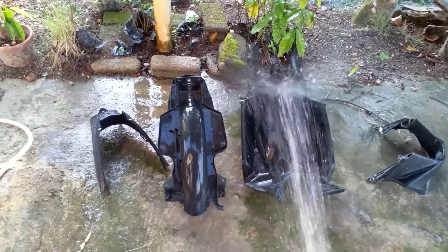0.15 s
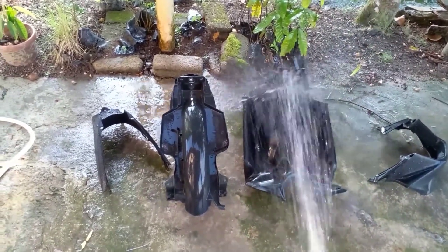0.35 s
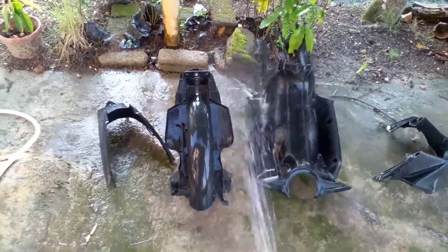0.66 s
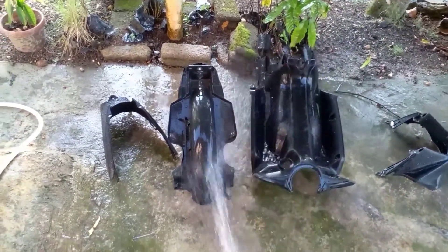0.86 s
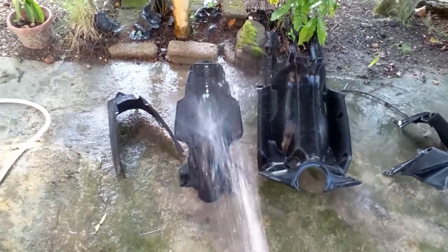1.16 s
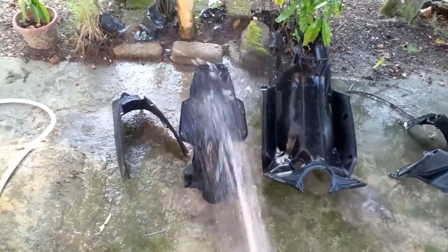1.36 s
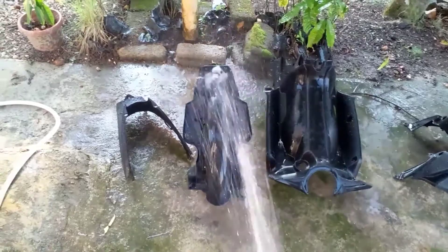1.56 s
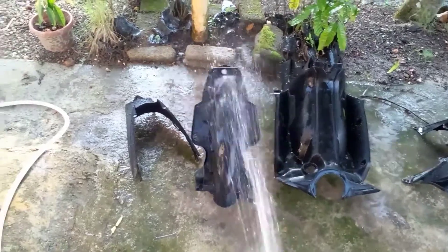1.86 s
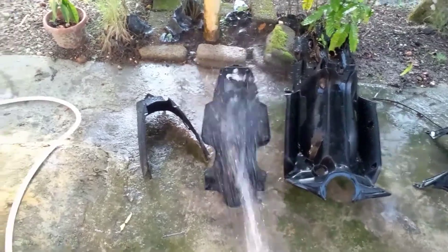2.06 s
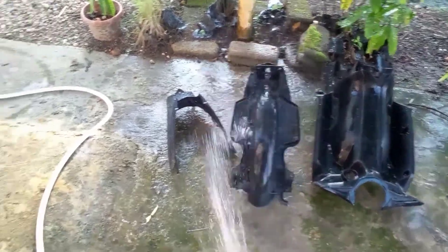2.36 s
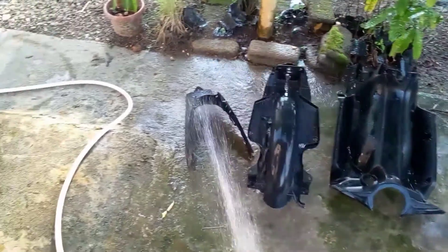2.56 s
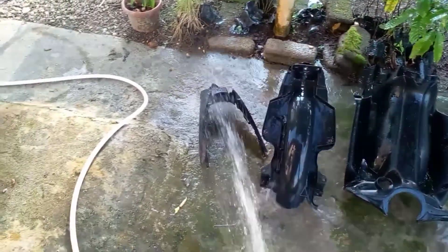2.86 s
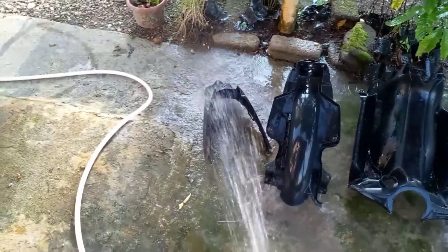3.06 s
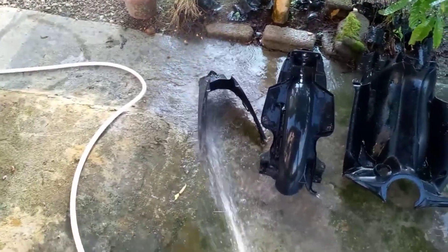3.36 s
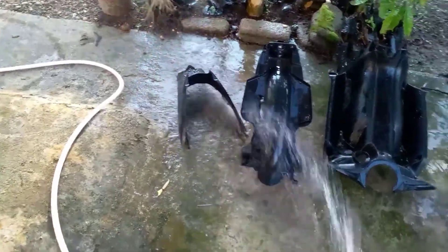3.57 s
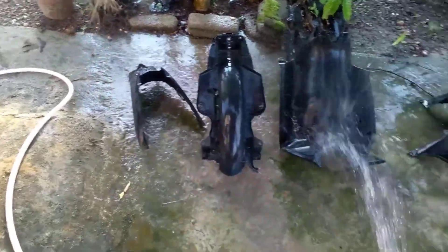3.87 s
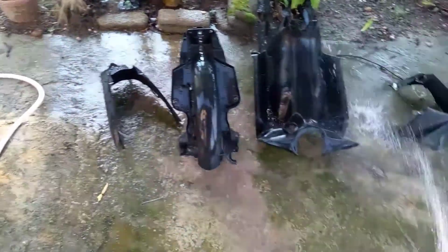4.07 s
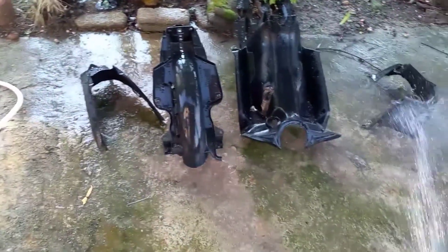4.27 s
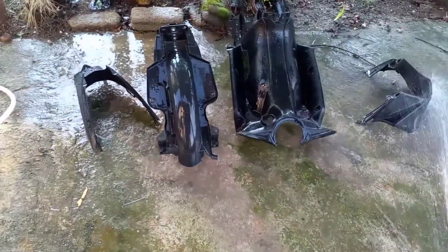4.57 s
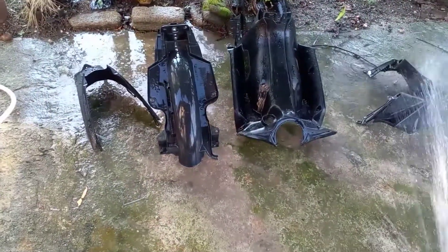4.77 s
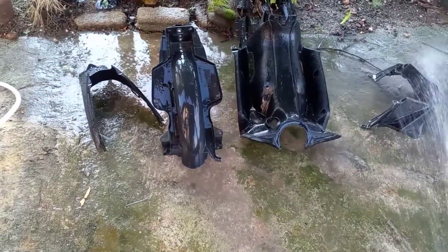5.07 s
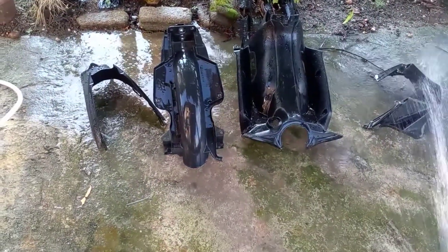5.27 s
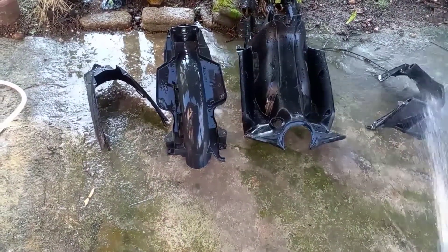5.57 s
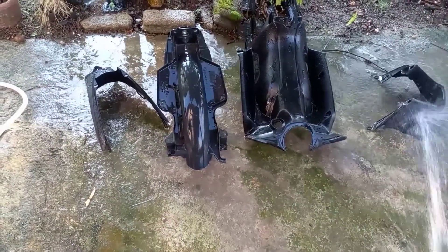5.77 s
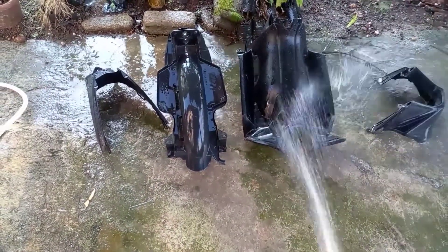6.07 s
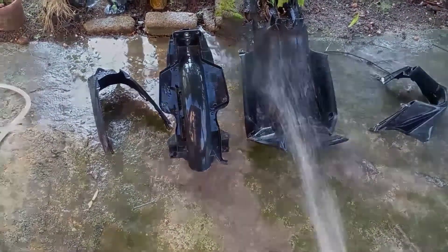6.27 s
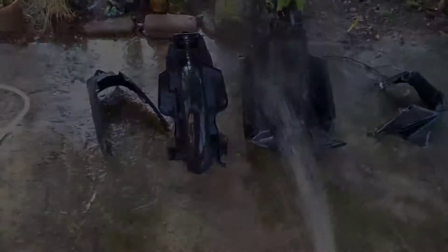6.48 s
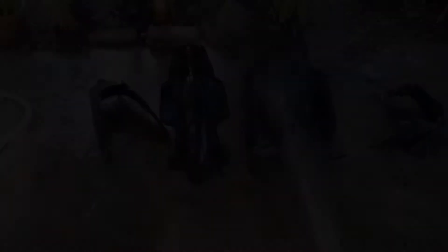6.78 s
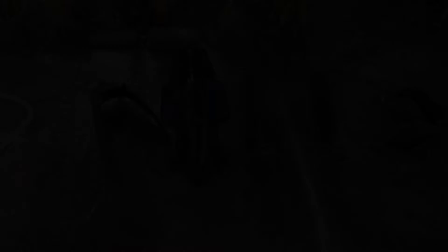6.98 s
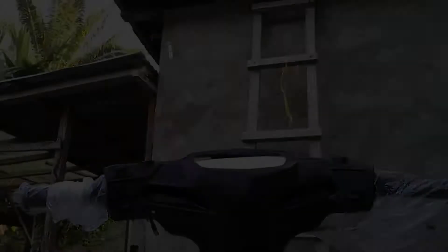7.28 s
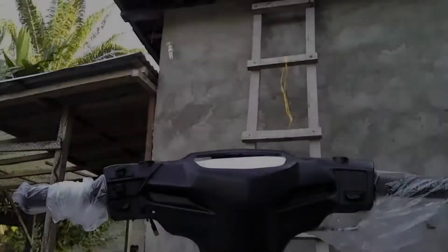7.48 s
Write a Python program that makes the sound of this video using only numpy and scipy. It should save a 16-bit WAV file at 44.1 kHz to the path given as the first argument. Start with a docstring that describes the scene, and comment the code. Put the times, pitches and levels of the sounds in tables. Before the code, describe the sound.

A hose jet sweeps over four plastic panels on wet concrete outdoors. The spray drums on the large and middle shells, thins to light hiss on a narrow arch, then patters hollowly on a small piece and returns to the large one. Drops tick, heavy slugs knock, a faint engine hums far away. One nearby microphone; everything fades to silence, then a low hum begins.

```python
"""Garden hose on plastic panels

A jet over four panels on wet concrete: noise shaken by random drops and slugs takes the colour of the panel.
Large drops tick (short rings, cracks), slugs knock (decaying shell modes), filling hollows ring (sliding resonance).
A bird chirps (swept sines), a distant engine hums (wavering orders over filtered noise). All this fades out;
after a silence a lumpy low hum and faint outdoor air (filtered noise) swell up."""
import sys
import numpy as np
from scipy import signal
from scipy.io import wavfile
from scipy.ndimage import uniform_filter1d

SR = 44100
rng = np.random.default_rng(int(sys.argv[2]) if len(sys.argv) > 2 else 0)


def gain_from_db(level_db):
    """Convert decibel levels to linear amplitude factors (20 dB per decade)."""
    decades = np.asarray(level_db, float) / 20
    return 10 ** decades


def file_out(sig):
    """Save sig as 16-bit WAV at sys.argv[1]."""
    # one column per channel
    cols = np.atleast_2d(sig).T
    # limit, then scale
    lim = np.clip(cols, -1, 1)
    pcm = np.round(lim * 32767).astype(np.int16)
    wavfile.write(sys.argv[1], SR, pcm)


N = 336924
TIME = np.arange(N) / SR
TAPS_HZ = np.fft.rfftfreq(4096, 1 / SR)


def evened(x):
    """Scales to rms 1."""
    return x / np.sqrt(np.mean(x ** 2) + 1e-20)


def read(points):
    """Spectrum in dB at every filter bin, interpolated over log frequency."""
    hz, db = np.transpose(points)
    return np.interp(np.log(TAPS_HZ + 1), np.log(hz + 1), db)


def play(rows):
    """Joins the rows of a curve, holding its last values."""
    s, *columns = np.transpose(rows)
    return [np.interp(TIME, s, c) for c in columns]


def bands(peaks):
    """Sum of bell-shaped lifts in dB."""
    return sum(db * np.exp(-((TAPS_HZ - hz) / width_hz) ** 2) for hz, width_hz, db in peaks)


def colour(x, db):
    """Causal minimum-phase filter of energy 1 with the given dB shape."""
    log_gain = np.log(gain_from_db(np.maximum(db - db.max(), -100)))
    circle = np.concatenate([log_gain, log_gain[-2:0:-1]])
    spectrum = np.exp(np.conj(signal.hilbert(circle)))
    taps = np.fft.ifft(spectrum).real
    return signal.oaconvolve(x, taps / np.linalg.norm(taps))[:N]


def add(mix, s, sound):
    """Mixes a sound in at a time."""
    part = mix[round(s * SR):][:len(sound)]
    part += sound[:len(part)]


def wander(per_s):
    """Slow random curve of rms 1: sines of random phase up to the given rate."""
    hz = np.geomspace(per_s / 8, per_s, num=24)
    coarse = TIME[::64]
    turns = hz * coarse[:, None] + rng.random(len(hz))
    sines = np.sin(2 * np.pi * turns)
    return np.interp(TIME, coarse, evened(sines.sum(axis=1)))


def lopsided(t, rise_s, fall_s):
    """Pulse with a Gaussian rise and an exponential fall."""
    return np.where(t < 0, np.exp(-(t / rise_s) ** 2), np.exp(-np.abs(t) / fall_s))


# where the jet lands: (from [s], panel: 0 large, 1 middle, 2 thin arch, 3 small, 4 near end of the large)
AIM = [(0, 0), (.89, 1), (1.56, 1), (2.42, 2), (3.64, 1), (3.76, 4), (3.9, 4), (4.2, 3), (4.9, 3),
       (5.38, 3), (6.1, 4), (6.22, 4)]


def aim_at(s):
    """Row of the aim that holds at a time."""
    return np.searchsorted([row[0] for row in AIM], s, "right") - 1


def panel_at(s):
    """Panel the jet is on."""
    return np.array([row[1] for row in AIM])[aim_at(s)]


# colour of each panel under the jet: (frequency [Hz], relative level per Hz [dB])
LARGE = [(120, -54.5), (200, -7.5), (422, 2), (564, -6), (842, -12.5), (940, -7.5), (1300, -21),
         (1520, -14), (1780, -13.5), (2050, -18), (2850, -16.5), (3300, -24.5), (6590, -28.5),
         (7350, -24.5), (8200, -31), (15500, -22)]
MIDDLE = [(120, -58.5), (200, -7), (422, 3), (564, -4.5), (755, -11.5), (1430, -7), (1880, -9), (2130, -6),
          (2900, -9.5), (3550, -12.5), (4030, -12.5), (6240, -15), (7620, -16.5), (9480, -18),
          (14200, -9.5), (15500, -8.5)]
ARCH = [(120, -37), (200, -6), (298, -11), (339, -3), (385, -7), (422, -11.5), (554, -3), (618, -13),
        (769, -7), (1300, -13), (1600, -7.5), (2170, -6), (2500, -11.5), (3610, -21), (7220, -21.5),
        (8500, -22), (15500, -13.5)]
SMALL = [(120, -41.5), (200, -18), (249, -13), (370, -3), (440, -6), (534, 3.5), (702, -15), (923, -6),
         (1400, -22), (1590, -11), (1840, -14), (2200, -12.5), (2700, -20), (6020, -19.5), (9480, -23),
         (13200, -13), (15500, -14)]
LARGE_NEAR = [(120, -22.5), (200, -26), (310, -2), (454, -6), (506, 0), (618, -12), (858, -11), (1330, -11),
              (1680, -5.5), (2250, -6), (2500, -9.5), (3300, -22), (5910, -27.5), (8200, -31.5),
              (12200, -20.5), (15500, -19)]
# per panel, narrow bands in patter and fizz: (frequency [Hz], width [Hz], lift [dB])
FIZZ_BANDS = [
    [(4200, 320, 3.5), (7400, 250, 1.5), (11000, 250, 0)],
    [(2360, 250, 0), (3950, 200, 1.5), (7600, 350, 5)],
    [(2240, 186, 0.5), (4860, 890, 3.5), (7300, 450, 5.5), (11000, 250, 0), (13070, 400, 0)],
    [(4460, 280, 2.5), (5900, 390, 1.5), (8860, 240, 2.5), (11800, 550, 2.5), (13500, 500, -2.5)],
    [(4630, 550, 2.5), (7500, 500, 5.5), (8850, 400, 5.5)],
]
# the bounce off the concrete cancels part of the spray: (frequency [Hz], width [Hz], lift [dB])
GROUND_DIP = [(1324, 99, -1.5), (2920, 490, -0.5)]
# drumming, patter, fizz: (low edge [Hz], high edge [Hz])
BAND_EDGES_HZ = [(190, 1200), (1200, 3200), (3200, 20000)]
# per band, share of the power swing from drops: (share [0-1])
DROP_DEPTH = [0.2, 0.55, 0.62]
# per band, share of the power swing from slugs of water: (share [0-1])
SLUG_DEPTH = [0.5, 0.45, 0.42]
# per band, ringing drops against the hiss: (amplitude ratio)
PING_SHARE = [0.34, 0.11, 0.32]


def jet():
    """One stream of drops and slugs shakes noise into the colour of the panel that is hit."""
    drops = bursts(per_s=400, spread_db=2.2, rise_s=0.0001, fall_s=0.0014)
    slugs = bursts(per_s=95, spread_db=2.0, rise_s=0.0008, fall_s=0.011)
    hit = panel_at(TIME)
    levels_db = jet_levels_db()
    ringing = pings(per_s=1800, spread_db=3.4, cycles=7)
    # dense modes of each shell, too close to tell apart
    ripple = uniform_filter1d(rng.standard_normal((5, len(TAPS_HZ))), size=4, axis=1)
    fine_db = 1.3 * evened(ripple)
    panels = [LARGE, MIDDLE, ARCH, SMALL, LARGE_NEAR]
    out = np.zeros(N)
    for (low_hz, high_hz), db, drop, slug, ping in zip(
            BAND_EDGES_HZ, levels_db, DROP_DEPTH, SLUG_DEPTH, PING_SHARE):
        power = (1 - drop + drop * drops) * (1 - slug + slug * slugs)
        hiss = np.sqrt(power) * rng.standard_normal(N)
        drive = evened(hiss + ping * ringing) * gain_from_db(db)
        low_cut = 1 + (low_hz / (TAPS_HZ + 1)) ** 16
        high_cut = 1 + (TAPS_HZ / high_hz) ** 16
        band_db = -10 * np.log10(low_cut * high_cut)
        for k, panel in enumerate(panels):
            share = uniform_filter1d(1. * (hit == k), size=900)  # the jet crosses an edge in 20 ms
            shape_db = read(panel) + bands(FIZZ_BANDS[k] + GROUND_DIP) + fine_db[k] + band_db
            out += colour(drive * np.sqrt(np.abs(share)), shape_db)
    return out


# the jet: (time [s], force on the shell [dB], mist thrown up [dB above the force])
JET = [(0.0, -24.5, -2), (0.05, -26.5, -0.5), (0.16, -27, 1), (0.18, -28.5, 1), (0.3, -27.5, -1),
       (0.57, -29, 1), (0.6, -25, 0.5), (0.68, -31, 0.5), (0.76, -31, 6.5), (0.81, -36, 4.5),
       (0.87, -38.5, 8.5), (0.89, -43.5, 12), (0.902, -28, 4), (0.915, -26.5, 2.5), (1.0, -25, 2.5),
       (1.08, -30.5, 3), (1.21, -23, -1), (1.3, -29.5, 2.5), (1.39, -27, 5), (1.46, -30.5, 3),
       (1.54, -27, 4.5), (1.57, -25.5, 2.5), (1.65, -29, 6.5), (1.69, -23, 2.5), (1.72, -30, 7),
       (1.75, -25, 4.5), (1.79, -32, 9), (1.835, -21.5, -2), (1.87, -26.5, 6), (1.97, -26.5, 3.5),
       (2.07, -28, 4), (2.12, -26, 1.5), (2.165, -23, -1), (2.18, -20, -3), (2.208, -23, 0.5),
       (2.222, -34.5, 4), (2.25, -25, 2.5), (2.29, -29, 3.5), (2.39, -24, 2.5), (2.42, -36.5, 5),
       (2.46, -32, -1), (2.48, -42, 8), (2.52, -42.5, 13), (2.6, -36.5, 7), (2.68, -31.5, 3.5),
       (2.74, -34, 2.5), (2.78, -28, -2), (2.853, -30.5, 6.5), (2.87, -36.5, -1.5), (2.98, -38.5, 7.5),
       (3.03, -35, 5), (3.1, -38, 3.5), (3.3, -38.5, 4.5), (3.45, -43, 9), (3.6, -44, 10.5),
       (3.645, -45.5, 10), (3.652, -22.5, 2), (3.67, -27.5, 1.5), (3.72, -31.5, 0), (3.745, -38.5, -1),
       (3.77, -35.5, 5), (3.81, -27.5, 2.5), (3.86, -32, 3.5), (3.92, -32, 3.5), (3.98, -36.5, 6),
       (4.07, -32.5, 8), (4.1, -42.5, 11), (4.15, -45.5, 22.5), (4.19, -37, 8.5), (4.22, -32, 6.5),
       (4.29, -33.5, 6.5), (4.42, -29.5, 6.5), (4.51, -30, 4), (4.55, -34, 5), (4.67, -43, 9.5),
       (4.87, -32, 3.5), (4.915, -28.5, 1), (4.94, -33, 3), (4.965, -25.5, 1.5), (4.98, -28.5, 2),
       (4.99, -25.5, 1.5), (5.03, -28.5, 2), (5.15, -34, 5), (5.2, -29, -0.5), (5.33, -30.5, 6.5),
       (5.43, -26.5, 2.5), (5.54, -30, 2.5), (5.95, -28.5, 4.5), (6.02, -34, 5.5), (6.1, -39, 10.5),
       (6.125, -31, 4.5), (6.175, -24.5, -3), (6.195, -29, -0.5), (6.225, -25.5, -0.5), (6.3, -31, 1),
       (6.45, -29.5, -1.5), (6.6, -29.5, 1.5), (6.7, -29.5, 0.5), (6.74, -34.5, 5), (6.8, -31, 0.5),
       (6.93, -32, 0.5), (6.96, -32.5, -0.5), (7.1, -30, 0)]
# per aim row, hollowness of the spot: (drumming [dB above the force])
HOLLOW_DB = [2, -0.5, -4, -5.5, -1.5, 5, 2.5, -2, -5.5, -2.5, 2.5, -0.5]
# per aim row: (patter [dB above the force])
PATTER_DB = [-0.38, -1.04, -1.5, -0.84, -2.6, -0.56, 0.75, -1.2, -0.92, -1, -1.7, -0.36]
# per band, its own slow random surge of the stream: (swing [dB rms], sign has no audible effect)
SURGE_DB = [0.5, -1, 0.5]


def jet_levels_db():
    """Drumming, patter and fizz all follow the force; a glancing jet mists more and drums less."""
    glance, force_swing = 0.11, 0.029  # drumming lost per dB of mist; extra drumming per dB of force
    force_db, mist_db = play(JET)
    spots_db = np.array([HOLLOW_DB, PATTER_DB], float)[:, aim_at(TIME)]
    hollow_db, patter_db = uniform_filter1d(spots_db, size=900, axis=1)
    drumming_db = force_db + hollow_db - glance * mist_db + force_swing * (force_db + 30)
    levels_db = [drumming_db, force_db + patter_db, force_db + mist_db]
    return [db + surge_db * wander(per_s=25) for db, surge_db in zip(levels_db, SURGE_DB)]


def bursts(per_s, spread_db, rise_s, fall_s):
    """Power envelope of random impacts, a few of them large; mean 1."""
    struck = np.minimum(rng.exponential(1, N), 3.2)
    size = gain_from_db(2 * spread_db * struck) * (rng.random(N) < per_s / SR)
    t = np.arange(4000) / SR
    pulse = np.exp(-t / fall_s) * (1 - np.exp(-t / rise_s))
    power = np.abs(signal.oaconvolve(size, pulse)[:N])
    return power / power.mean()


def pings(per_s, spread_db, cycles):
    """Small drops, each a decaying, slightly rising sine at one of 20 pitches; rms 1."""
    struck = np.minimum(rng.exponential(1, N), 4)
    size = gain_from_db(spread_db * struck) * (rng.random(N) < per_s / SR)
    pitches_hz = np.geomspace(300, 12000, num=20)
    which, out = rng.integers(0, len(pitches_hz), N), np.zeros(N)
    for k, hz in enumerate(pitches_hz):
        turns = np.arange(2000) * hz / SR
        envelope = np.exp(-turns / cycles) * (1 - np.exp(-turns))
        ring = envelope * np.sin(2 * np.pi * turns * (1 + 0.0042 * turns))
        out += signal.oaconvolve(size * (which == k), hz / 1000 * ring)[:N]
    return evened(out)


def patchy(x):
    """Lifts and lowers random patches of the spectrum, about 700 Hz wide and 70 ms long."""
    patch_db = 1.4  # rms
    z = signal.stft(x, nperseg=512)[2]
    patches = rng.standard_normal(z.shape[::-1])
    for _ in range(2):
        patches = uniform_filter1d(patches, size=9, axis=0)
        patches = uniform_filter1d(patches, size=6, axis=1)
    return signal.istft(z * gain_from_db(patch_db * evened(patches).T), nperseg=512)[1][:N]


# large drops: (peak time [s], level [dB], ring [Hz], share of crack [0-1])
TICKS = [(0.079, -8.5, 6600, 0.48), (0.1263, -12.5, 7060, 0.45), (0.2003, -17, 11000, .4),
         (0.46, -18, 9000, 0.6), (0.71, -10.5, 3740, 0.65), (0.9102, -6.5, 5300, 0.5),
         (0.9215, -8, 2410, 0.5), (0.9375, -10, 2500, 0.6), (0.9955, -9.5, 2070, .3),
         (1.0001, -9.5, 11900, 0.8), (1.036, -11, 9000, 0.7), (1.162, -19, 2600, 0.7),
         (1.2434, -15, 8850, 0.8), (1.274, -14, 11900, .1), (1.3233, -11, 2580, 0.4),
         (1.541, -10.5, 2550, .4), (1.4742, -12.5, 2730, 0.35), (1.5884, -6.5, 4040, 0.6),
         (1.696, -13, 3170, 0.3), (1.728, -18, 4000, .7), (1.836, -17, 2540, 0.44), (1.924, -15, 4030, 0.4),
         (2.058, -16, 2550, 0.6), (1.8947, -6.5, 11000, 0.6), (1.9675, -14, 8120, 0.7),
         (1.995, -17, 6600, .3), (2.1777, -9, 4640, 0.6), (2.208, -14, 4700, 0.6), (2.2433, -9, 4930, 0.7),
         (2.3498, -8, 12200, 0.35), (2.3869, -14.5, 4300, 0.34), (2.162, -17, 4100, .2),
         (2.5393, -16, 5440, 0.4), (2.5586, -11, 7100, 0.5), (2.6506, -17, 7340, 0.25),
         (2.7185, -21, 7200, 0.3), (2.8, -16, 7050, 0.6), (2.8295, -10.5, 5460, 0.67),
         (2.8548, -9, 11800, 0.5), (2.9158, -24, 2670, 0.15), (2.964, -16.5, 7140, 1),
         (3.028, -16.5, 2070, 0.5), (3.129, -19, 2760, 0.5), (3.1679, -19.5, 806, 0.55),
         (3.211, -27, 3930, 0.2), (3.2335, -22, 2650, 0.1), (3.28, -25, 6500, .8), (3.267, -23, 2150, 0.2),
         (3.268, -29, 800, 0.1), (3.402, -30, 2150, 0), (2.966, -24, 2700, .2), (3.3382, -26, 2800, .2),
         (3.379, -22, 2730, 0.26), (3.4275, -20, 7300, .6), (3.4534, -20, 2760, 0.13),
         (3.497, -22, 7250, 0.5), (3.5895, -20, 7400, 0.7), (3.6304, -21, 2660, 0.4),
         (3.6559, -11, 6300, 0.6), (3.7278, -20, 2700, 0.24), (3.7708, -15, 4460, 0.37),
         (4.0245, -19, 6180, .9), (4.1415, -20, 9500, .8), (4.5065, -6.5, 11000, .7),
         (4.556, -17, 11800, 0.4), (4.718, -26.5, 1880, 0), (4.6835, -20, 6000, 0.75),
         (4.7808, -17.5, 5900, 0.3), (4.821, -15, 1930, 0.1), (4.8526, -9, 4240, 0.6),
         (4.943, -17, 12000, .2), (4.9882, -12, 6140, 0.53), (4.9993, -8.5, 1840, 0.35),
         (5.0631, -12, 4350, .5), (5.139, -13.5, 1910, 0.1), (5.184, -10, 12100, 0.4),
         (5.222, -14, 9900, 0.25), (5.243, -16, 4400, 0.5), (5.4353, -14, 11000, 0.2),
         (5.602, -10.5, 4540, 0.7), (5.666, -13.5, 3830, 0.66), (5.7944, -16, 4700, 0.5),
         (5.9952, -11, 5300, 0.8), (6.1739, -10.5, 970, 0.06), (6.2205, -17, 4900, 0.66),
         (6.2612, -13, 7570, 0.73), (6.372, -20, 7800, 0.45), (6.396, -25, 5240, .7),
         (6.481, -15, 4690, 0.8), (6.502, -20, 4630, 0.5), (6.575, -21, 6000, .8), (6.6734, -16, 4730, 0.4),
         (6.461, -25, 4800, 0.4), (6.8135, -15, 6000, 0.9), (6.828, -15, 13500, .2),
         (6.918, -19, 5000, 0.7), (6.931, -16, 2100, 0.4)]
# colour of the crack: (frequency [Hz], relative level per Hz [dB])
CRACK = [(1500, -27), (3000, -0.5), (6000, -2.5), (9000, -2.5), (15500, 0)]


def ticks():
    """Each large drop: a few cycles of ring under a short crack of noise; lesser ones ring the panel's bands."""
    small_per_s, small_db, small_spread_db = 45, -30.5, 2.5
    crack_rise_s, crack_fall_s = 0.0001, 0.001
    t, rings, cracks = np.arange(900) / SR - 0.003, np.zeros(N), np.zeros(N)
    rows = list(TICKS)
    for when, size, band, share in rng.random((round(small_per_s * 7), 4)):
        s = when * 7 + 0.01
        peaks = FIZZ_BANDS[panel_at(s)]
        hz = peaks[int(band * len(peaks))][0]
        db = small_db - small_spread_db * np.log(max(size, 0.06))
        rows.append((s, db, hz, 0.4 + 0.6 * share))
    for (s, db, hz, share), noise in zip(rows, rng.standard_normal((len(rows), 2, 900))):
        width_s = 0.001 + 1.6 / hz  # low rings last longer
        wobble = np.cumsum(hz / 28000 * noise[1])  # high rings wobble more
        ring = lopsided(t, 0.6 * width_s, 1.5 * width_s) * np.cos(2 * np.pi * hz * t + wobble)
        add(rings, s + t[0], gain_from_db(db) * (1 - share) * ring)
        puff = lopsided(t, crack_rise_s, crack_fall_s) * noise[0]
        add(cracks, s + t[0], gain_from_db(db) * share * 2 * puff / np.abs(puff).max())
    return rings + colour(cracks, read(CRACK))


# a hollow filling with water: (start [s], length [s], rms level before the envelope [dB], from [Hz], to [Hz])
HOLLOW_RINGS = [(0.892, 0.185, -30, 2440, 2000), (2.582, 0.31, -34.5, 2150, 2320),
                (2.4, 0.43, -42, 2650, 2400), (4.79, 0.41, -30, 2000, 1870),
                (5.297, 0.31, -29.5, 1790, 2040), (4.4, 0.66, -37, 2900, 2000),
                (4.7, 0.22, -45.5, 1200, 2000), (0.2, 0.61, -39.5, 1500, 1650),
                (2.95, 0.36, -44.5, 2150, 2050)]


def hollows():
    """Bursts of splash excite one resonance whose pitch slides as the water level changes."""
    width_hz, rise_share = 280, 0.15  # rise as a share of the length
    power = 0.26 + bursts(per_s=200, spread_db=3.0, rise_s=0.00059, fall_s=0.0029)
    splash = np.sqrt(power) * rng.standard_normal(N)
    r, out = np.exp(-np.pi * width_hz / SR), np.zeros(N)
    for s, length_s, db, from_hz, to_hz in HOLLOW_RINGS:
        drive = splash[round(s * SR):][:round(length_s * SR)]
        u = np.linspace(0, 1, len(drive))
        turn = np.exp(2j * np.pi * np.cumsum(from_hz + (to_hz - from_hz) * u) / SR)
        # shift the pitch to 0 Hz, smooth with a double pole, shift back
        smooth = signal.lfilter([1], np.convolve([1, -r], [1, -r]), drive / turn)
        ring = evened((turn * smooth).real)
        envelope = np.sqrt(np.clip(np.minimum(u / rise_share, 2 * (1 - u)), 0, 1))
        add(out, s, gain_from_db(db) * envelope * ring)
    return out


# heavy slugs: (time [s], level before attack and decay [dB], spot struck [0 broad face - 1 stiff edge])
KNOCKS = [(0.078, -6, 1), (0.108, -9.5, .5), (0.138, -10, .05), (0.15, -4.5, .5), (0.512, -8.5, 0.48),
          (0.201, -3, 0.91), (0.473, 3.5, 0.04), (0.638, -11, 0.5), (0.741, -5.5, 0.55), (0.78, -6, 0.51),
          (0.913, -5, 0.88), (1.124, 0, 0.77), (2.093, -4, 0.85), (2.191, -16, .35), (2.233, -21.5, .05),
          (2.308, -12.5, 0.34), (2.385, -9.5, 0.45), (3.653, -9, 0.83), (3.809, -8, 0.77), (3.812, -4, 0.5),
          (3.829, -4.5, 0.86), (3.854, -15, 0.36), (3.872, -14, 0.57), (3.9, -25, 1), (4.029, -11.5, 0.076),
          (4.492, -9.5, 0.42), (4.987, -1, 0.041), (5.165, -11.5, 0.42), (5.483, -7.5, 0.51),
          (5.843, -14, 1), (6.119, -19.5, 0.25), (6.14, -7, 0.1), (6.154, -6, 0.038), (6.166, -15.5, 0.83),
          (6.172, -14.5, 0.3), (6.207, -17.5, .5)]
# per panel, low modes from face to edge: (frequency [Hz], t60 [s])
SHELL_MODES = [
    [(368, 0.031), (422, 0.047), (458, 0.032)],
    [(266, 0.2), (345, 0.053), (428, 0.038), (520, 0.064)],
    [(555, .045)],
    [(500, 0.025), (530, 0.049), (590, 0.06)],
    [(297, 0.054), (409, 0.0556), (510, 0.06), (830, 0.044), (950, 0.05)],
]


def knocks():
    """Each heavy slug rings the modes of its shell, most the one nearest the spot struck."""
    spot_width, attack_s = 0.14, 0.006
    t, out = np.arange(8000) / SR, np.zeros(N)
    for s, db, spot in KNOCKS:
        modes = SHELL_MODES[panel_at(s + 0.02)]
        for place, (hz, t60_s) in zip(np.linspace(0, 1, len(modes)), modes):
            ring = np.exp(-((place - spot) / spot_width) ** 2) * np.sin(2 * np.pi * hz * t)
            add(out, s, gain_from_db(db - 60 * t / t60_s) * (1 - np.exp(-t / attack_s)) * ring)
    return out


# bird: (start [s], length [s], peak level [dB], from [Hz], to [Hz])
CHIRPS = [(.008, 0.035, -34, 4480, 4260), (0.407, 0.029, -25.5, 4460, 3950)]


def bird():
    """Short falling whistles from a distant bird, blurred by random phase steps."""
    out = np.zeros(N)
    for s, length_s, db, from_hz, to_hz in CHIRPS:
        t = np.arange(0, length_s, 1 / SR)
        hz = from_hz + (to_hz - from_hz) * t / length_s
        phase = np.cumsum(2 * np.pi * hz / SR + 0.19 * rng.standard_normal(len(t)))
        add(out, s, gain_from_db(db) * np.hanning(len(t)) * np.sin(phase))
    return out


# distant engine: (time [s], level [dB])
ENGINE_DB = [(0.0, -38.5), (1.5, -34), (2.6, -34.5), (3.1, -43.5), (3.5, -36), (4.8, -34.5), (5.2, -31.5),
             (6.2, -34), (7.14, -37)]
# speed: (time [s], first order [Hz])
ENGINE_HZ = [(0, 31.5), (1.2, 33.2), (2.0, 32), (2.8, 30.8), (3.9, 30.8), (4.6, 31.7), (5.0, 32.4),
             (5.6, 30.9), (6.3, 29.9), (7.14, 29.5)]
# harmonics of the speed: (order, relative level [dB])
ENGINE_ORDERS = [(2, 0), (3, -8), (4, 2), (5, -1), (7, -3.5), (8, -4.5)]
# steadiness: (time [s], steady part of each order against its wavering [ratio])
ENGINE_STEADY = [(0, 1.4), (2.8, 1.5), (3.5, 2.8)]
# colour of the rumble: (frequency [Hz], relative level per Hz [dB])
ENGINE_RUMBLE = [(15, -58), (25, -24), (59, -11.5), (124, 5.5), (143, 1.5), (173, -6.5), (231, -2),
                 (300, -5.5), (390, -36.5), (660, -120)]


def engine():
    """Orders of a slow engine, each wavering in strength and phase, over an equally strong low rumble."""
    waver_db, waver_hz = 0.5, 2.5
    level_db = play(ENGINE_DB)[0] + waver_db * wander(per_s=9.2)
    turns = np.cumsum(play(ENGINE_HZ)[0]) / SR
    hum, steady = np.zeros(N), play(ENGINE_STEADY)[0]
    pole = np.exp(-2 * np.pi * waver_hz / SR)
    for (order, db), noise in zip(ENGINE_ORDERS, rng.standard_normal((len(ENGINE_ORDERS), 2, N))):
        real, imaginary = [evened(signal.lfilter([1], [1, -pole], n)) for n in noise]
        strength = steady + real + 1j * imaginary
        hum += gain_from_db(db) * np.real(strength * np.exp(2j * np.pi * order * turns))
    rumble = colour(rng.standard_normal(N), read(ENGINE_RUMBLE))
    return gain_from_db(level_db) * evened(evened(hum) + rumble)


# colour of the noise in the hum: (frequency [Hz], relative level per Hz [dB])
AFTER_RUMBLE = [(15, -32), (25, -16), (49, -6.5), (97, -5.5), (148, -4.5), (190, -38.5), (356, -17),
                (500, -44.5), (650, -77), (1100, -120)]
# colour of the air: (frequency [Hz], relative level per Hz [dB])
AFTER_AIR = [(290, -26), (500, 2), (620, -3), (927, -7), (1010, -7), (1310, -3), (1720, -13), (4440, -9),
             (8480, -18), (15500, -20)]


def quiet_air():
    """A lumpy low hum and faint outdoor air swell up from silence."""
    start_s, rise_s, air_db, air_rise_s = 7.51, 0.016, -58, 0.11
    hum_hz, hum_from_db, hum_db_per_s, noise_share = 85.2, -46, 170.5, 0.25
    lumps_per_s, lump_db, lump_lag_s = 28, 3.5, 0.006
    t = np.maximum(TIME - start_s, 0)
    lumps = np.cos(2 * np.pi * lumps_per_s * (t - lump_lag_s))
    hum_db = hum_from_db + hum_db_per_s * t + lump_db * lumps
    rumble, air = rng.standard_normal((2, N))
    tone = np.sqrt(2) * np.sin(2 * np.pi * hum_hz * t)
    hum = tone + noise_share * colour(rumble, read(AFTER_RUMBLE))
    air = gain_from_db(air_db) * np.clip(0.11 + t / air_rise_s, 0, 1) * colour(air, read(AFTER_AIR))
    return np.clip(t / rise_s, 0, 1) ** 2 * (gain_from_db(hum_db) * hum + air)


def scene():
    """Everything at one microphone: a straight fade with a final cut, then the quiet air."""
    fade_from_s, fade_to_s, cut_s = 6.41, 7.174, 7.143
    fade = np.clip((fade_to_s - TIME) / (fade_to_s - fade_from_s), 0, 1) * (TIME < cut_s)
    hose = patchy(jet()) + ticks() + hollows() + knocks()
    return (fade * (hose + engine() + bird()) + quiet_air())[None]


def low_pass(x):
    """Removes everything above the highest recorded frequency."""
    return signal.sosfilt(signal.butter(12, 16820, fs=SR, output="sos"), x)


def record(dry):
    """Steep low-pass at 15540 Hz."""
    edge = signal.firwin(401, 15540, window=("kaiser", 9), fs=SR)
    mix = signal.oaconvolve(dry, edge[None], "same")
    return low_pass(mix)


dry = scene()
out = record(dry)
file_out(out)
```